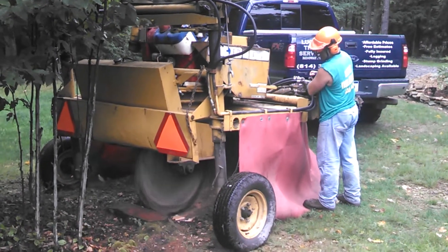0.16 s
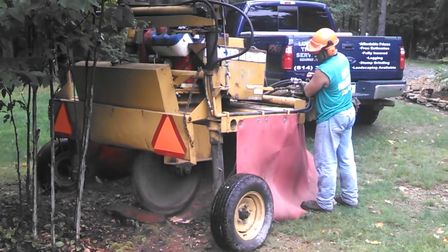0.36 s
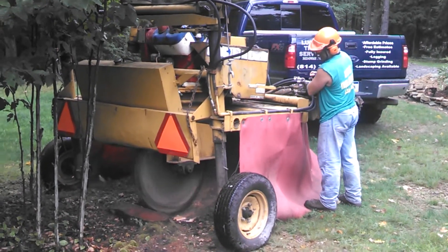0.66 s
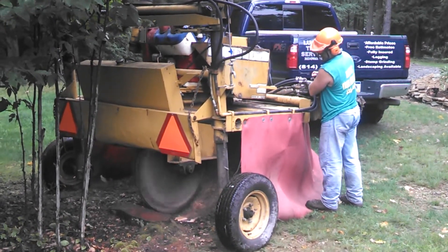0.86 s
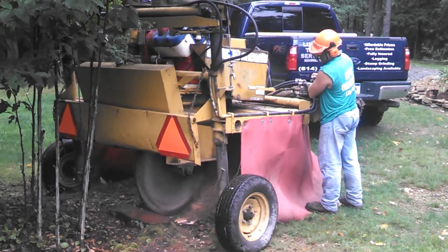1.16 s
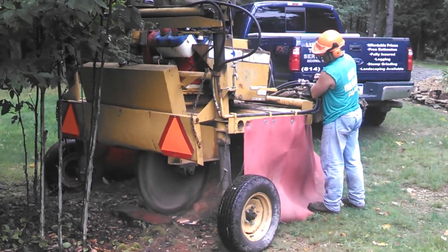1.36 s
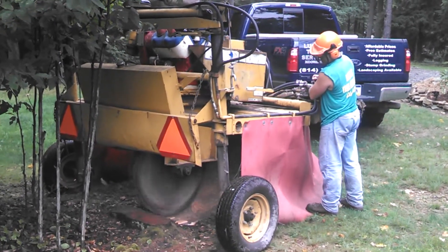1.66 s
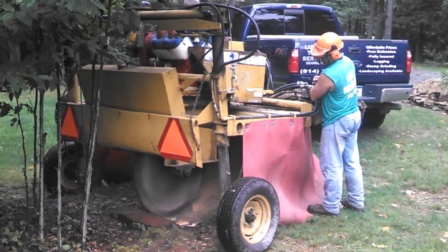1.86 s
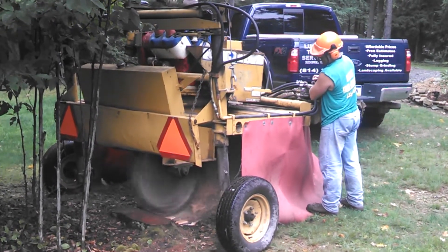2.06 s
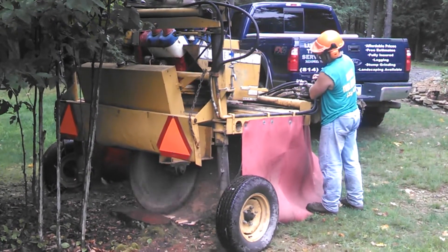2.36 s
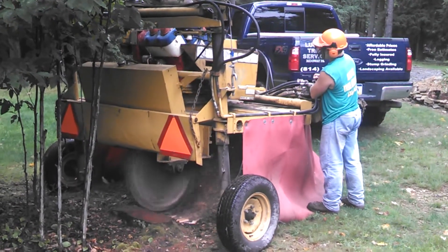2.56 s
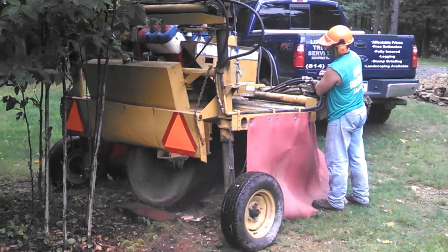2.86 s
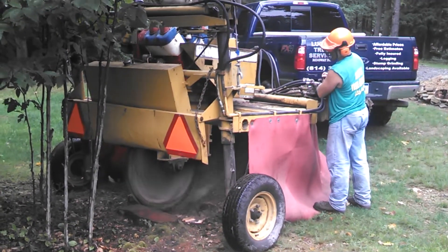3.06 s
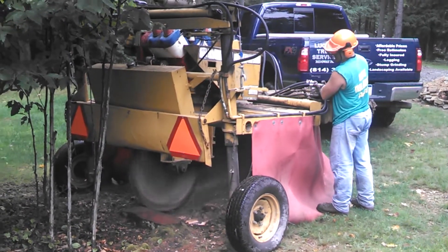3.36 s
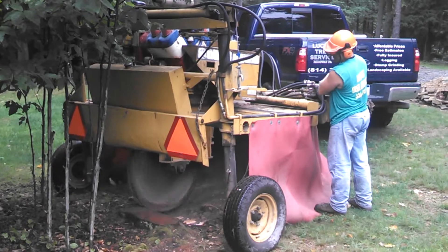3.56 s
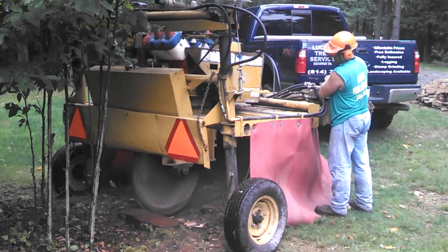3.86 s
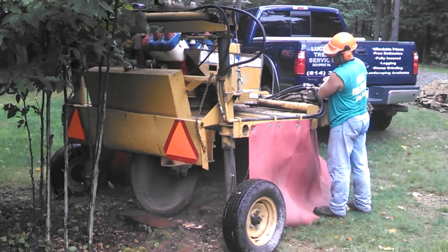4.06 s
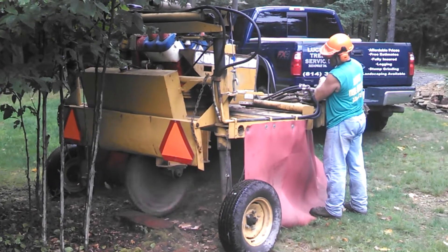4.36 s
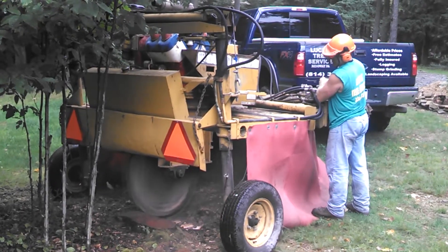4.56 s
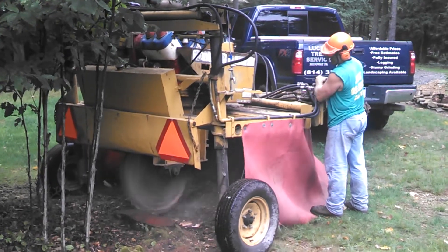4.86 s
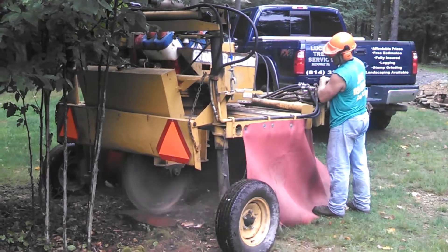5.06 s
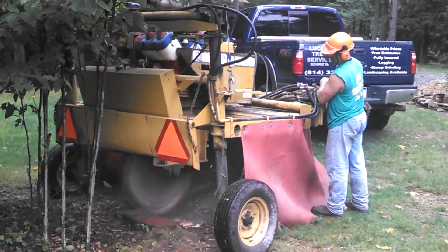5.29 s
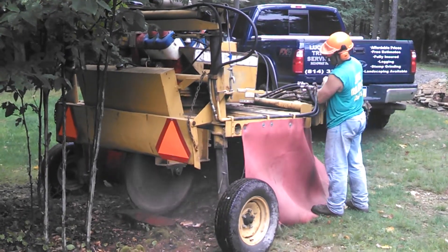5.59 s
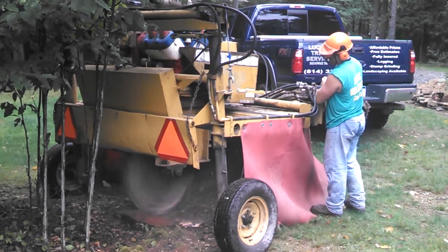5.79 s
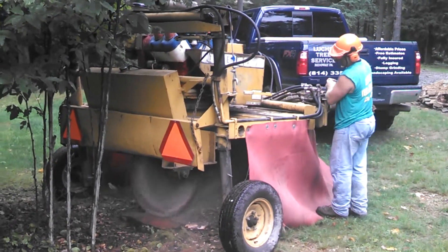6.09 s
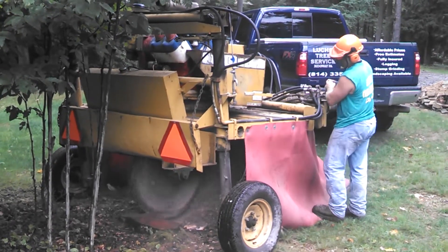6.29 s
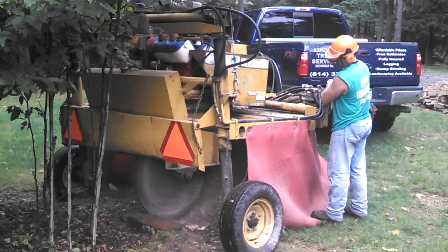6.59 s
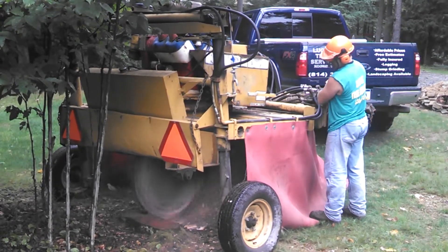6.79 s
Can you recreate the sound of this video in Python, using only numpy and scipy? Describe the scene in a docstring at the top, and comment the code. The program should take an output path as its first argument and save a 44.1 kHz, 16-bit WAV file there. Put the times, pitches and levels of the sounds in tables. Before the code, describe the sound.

Rough, rapid wood grinding outdoors: droning engine, dense rasp and gritty spray, clustered metallic scrapes near three seconds, then ringing chatter as the engine sags.

```python
"""Stump grinder at work outdoors

A stump grinder works a few metres from a camera with two close microphone ports.
The petrol engine, sine lines on its firing rate, hums and sags; tooth blows shape noise into thud, rasp and spray.
Hard bites knock and shriek through resonances, grit splashes, and now and then a tooth pings on a stone.
The camera's gain control ducks at treble peaks and creeps back up; its stereo is widened and band-limited."""
import sys
import numpy as np
from scipy import signal
from scipy.fft import rfft, irfft
from scipy.io import wavfile
from scipy.ndimage import uniform_filter1d, minimum_filter1d

SR = 44100
rng = np.random.default_rng(int(sys.argv[2]) if len(sys.argv) > 2 else 0)


def unload_audio(sound):
    """Save the sound as a 16-bit wav file, at the path given as the first command line argument."""
    columns = np.transpose(np.atleast_2d(sound))
    # keep every value between -1 and 1, then stretch to whole-number steps
    steps = np.round(np.clip(columns, -1, 1) * 32767)
    wavfile.write(sys.argv[1], SR, steps.astype(np.int16))


N = 305602
T = np.arange(N) / SR
HZ = np.fft.rfftfreq(N, 1 / SR)

TOOTH_GROUPS = 4  # groups of teeth round the wheel
GROUPS_PER_FIRING = .4174  # groups that pass for each firing of the engine

# resonances of the wheel and its guard: mode_hz, width_hz, relative_db
WHEEL_MODES = [(702, 50, -10), (744, 28, -9), (774, 32, 1.5), (811, 33, -0.5), (845, 28, -5),
               (877, 35, -1.5), (922, 30, -3.5), (965, 30, -7), (1020, 56, -8)]
# resonances of the sheet-metal hood: mode_hz, width_hz, relative_db
HOOD_MODES = [(530, 70, -4), (700, 60, 0), (1035, 50, 0), (1225, 95, 1), (1320, 50, -3), (1460, 70, -1),
              (1535, 45, -2), (1600, 40, 2.5), (1835, 65, 1), (1965, 80, -1), (2170, 95, 0), (2415, 70, 1),
              (2510, 70, 0), (2900, 260, -6)]
# spectrum of flying dust, chips and grit: frequency_hz, relative_db_per_hz
SPRAY_SPECTRUM = [(500, -25), (2500, -3), (3400, 1), (4200, -1), (5300, 1), (7200, -.3), (9200, 1.5),
                  (10000, -2), (11000, -5.3), (12100, -4), (13000, .3), (15400, .3)]


def amp(db):
    """Decibels to gain."""
    return 10 ** (np.asarray(db) / 20)


def evened(x):
    """Scales each row to rms 1."""
    return x / np.sqrt(np.mean(x ** 2, -1, keepdims=True) + 1e-20)


def curves(rows):
    """Each column of a time table, sample by sample."""
    s, *columns = np.transpose(rows)
    return [np.interp(T, s, c) for c in columns]


def spectra(rows):
    """Each column of a frequency table, bin by bin along a log axis."""
    hz, *columns = np.transpose(rows)
    return [np.interp(np.log(HZ + 1), np.log(hz), c) for c in columns]


def filtered(x, response):
    """Passes x through a frequency response."""
    return irfft(rfft(x) * response, N)


def coloured(x, spectrum):
    """Gives x a spectrum, at rms 1."""
    return evened(filtered(x, amp(spectra(spectrum)[0])))


def rung(x, modes):
    """Lets x drive a set of steep-sided resonances, at rms 1."""
    response = sum(amp(db) / (1 + 2j * (HZ - hz) / width) ** 2 for hz, width, db in modes)
    return evened(filtered(x, response))


def driven_hard(modes):
    """Resonances kept near full swing by a dragging tooth, at rms 1."""
    swing = signal.hilbert(rung(noise(), modes))
    return evened(swing.real / np.hypot(abs(swing), .5))


def wander(rate_hz):
    """Random drift of rms 1, slower than about rate_hz."""
    return evened(filtered(rng.standard_normal(N), np.exp(-(HZ / rate_hz) ** 2)))


def noise():
    """Two rows of noise: the direct sound and the part scattered round the microphone."""
    return rng.standard_normal((2, N))


def clicks(times, sizes):
    """One impulse at each time."""
    return np.bincount(np.round(np.asarray(times) * SR).astype(int), sizes, N)[:N]


def bursts(impulses, rise_s):
    """Each impulse swells to its own height in rise_s and dies away."""
    u = T[:SR // 8] / rise_s
    return signal.oaconvolve(impulses, u * np.exp(1 - u))[:N]


def swells(times, lengths, levels_db):
    """A rounded swell of the given length and height at each time."""
    out = np.zeros(N)
    for s, length, db in zip(times, lengths, levels_db):
        shape = amp(db) * np.sqrt(signal.windows.cosine(round(abs(length) * SR) + 1))
        out[round(s * SR):][:len(shape)] += shape
    return out


def teeth(firings, uneven_db=2.5, lead_db=0.0):
    """The belt-driven wheel brings four groups of teeth round each turn, each blow of uneven depth."""
    passing = T[np.flatnonzero(np.diff(np.floor(firings * GROUPS_PER_FIRING)))]
    depth, late = np.clip(rng.standard_normal((len(passing), 2)), -1.7, 1.7).T
    # lead_db deepens one group's cut; at 0 dB all four are alike
    leading = np.arange(len(passing)) % TOOTH_GROUPS == 0
    # the ragged face of the stump meets each group a little early or late
    times = abs(passing + .0028 * late)
    return clicks(times, amp(uneven_db * depth + lead_db * leading))


def cutting(blows, sag_hz):
    """Thud, ring, rasp and spray follow their level curves, shaken by the uneven grain of the wood."""
    # how deep the wheel cuts as it sweeps across the stump: time_s, depth_db
    cut_depth = [(0, 0.5), (.35, -1.1), (.8, 0.2), (1.25, 1.5), (1.42, -1), (1.58, 1), (2.3, -0.1),
                 (2.85, 1), (3.02, 1.5), (3.25, 1), (3.33, 0.5), (3.62, -3.5), (4.2, -2), (4.55, -1.5),
                 (4.77, 1.8), (5.05, -0.5), (5.35, -0.7), (5.6, 0), (5.8, 0), (6.45, 0.5), (6.93, 0)]
    # level of the low thudding: time_s, level_db
    thud_levels = [(0, -25), (.6, -25.5), (.85, -24.5), (1.9, -24.5), (2.4, -27), (2.84, -24.5), (3, -29.5),
                   (3.4, -30), (4.15, -29), (4.45, -27), (5, -26), (5.2, -25), (6.93, -25)]
    grain_hz, grain_thud_db, grain_ring_db, grain_rasp_db = 3.1, .5, 2.5, 0.1
    # base levels in dB, and the dB gained per dB of cut
    rasp_db, rasp_growth = -25, 0.98
    spray_db, spray_growth = -25.5, 0.89
    ring_base_db, ring_growth = -26.5, 0.84
    ring_db_per_hz = 0.0342  # the wheel rings more as it drags the engine down

    cut_db = curves(cut_depth)[0] + grain_rasp_db * wander(grain_hz)
    thud_db = curves(thud_levels)[0] + grain_thud_db * wander(grain_hz)
    ring_db = ring_base_db + ring_growth * cut_db + ring_db_per_hz * sag_hz
    ring_db = ring_db + grain_ring_db * wander(grain_hz)
    return (thud(blows, thud_db)
            + wheel(blows, ring_db, sag_hz)
            + rasp(blows, rasp_db + rasp_growth * cut_db)
            + spray(blows, spray_db + spray_growth * cut_db))


def thud(blows, level_db, gain_db=0, steady=1.0, rise_s=0.0087):
    """Torn wood and soil drum under the hood: low noise that swells at each blow."""
    # spectrum of the drumming: frequency_hz, relative_db_per_hz
    thud_spectrum = [(20, -49), (45, -34), (75, -20.5), (120, -16), (160, 0.5), (190, -1), (212, -7.5),
                     (245, -2.5), (280, -3), (335, 4.5), (385, -3), (460, -8.5), (620, -10.5), (900, -8.5),
                     (3000, -45)]
    drumming = noise() * (steady + bursts(blows, rise_s))
    return amp(level_db + gain_db) * coloured(drumming, thud_spectrum)


def wheel(blows, level_db, sag_hz, gain_db=-4.0, steady=1.9, rise_s=0.0048, knock=0.41,
          lean_db=-2.5, lean_db_per_hz=1.0, roam_db=3.5, roam_hz=4, waver_s=.0005):
    """Knocks and scrapes ring the wheel; its upper modes lead as load grows and the contact roams."""
    lower_modes = 3  # the first modes, which lead in a light cut
    drive = evened(noise() * (steady + bursts(blows, rise_s)))
    drive[0] += knock * evened(blows)
    lean = amp(lean_db + lean_db_per_hz * sag_hz + roam_db * wander(roam_hz))
    lower = rung(drive, WHEEL_MODES[:lower_modes])
    upper = rung(drive, WHEEL_MODES[lower_modes:])
    ring = (lower + lean * upper) / np.hypot(1, lean)
    wavering = T + waver_s * wander(roam_hz)  # the pitch of the ring drifts a little
    return amp(level_db + gain_db) * np.array([np.interp(wavering, T, row) for row in ring])


def rasp(blows, level_db, fibre_db=0.2, hood_db=-3.5, hood_growth=0.54, steady=2.4, rise_s=0.011,
         clump_db=0.96, splinters_per_s=900, spread_db=2.5):
    """Wood fibres tear in clumps and fling splinters at the hood, which rattles more the harder the cut."""
    # spectrum of tearing fibres: frequency_hz, relative_db_per_hz
    fibre_spectrum = [(100, -41), (450, -11), (650, -2.5), (1000, -3.5), (1350, -2.5), (2000, -3),
                      (2450, -1), (2700, -6), (3000, -7.5), (3450, -11.5), (4300, -27), (12000, -61)]
    tearing = (steady + bursts(blows, rise_s)) * amp(clump_db * wander(126))
    size = amp(spread_db * np.minimum(rng.exponential(1, (2, N)), 4))
    splinters = np.sign(noise()) * size * (rng.random((2, N)) < splinters_per_s / SR)
    rattle_db = hood_db + hood_growth * (level_db - level_db.mean())
    rattle = amp(rattle_db) * rung(splinters * tearing, HOOD_MODES)
    fibres = amp(fibre_db) * coloured(noise() * tearing, fibre_spectrum)
    return amp(level_db) * (fibres + rattle)


def spray(blows, level_db, dust_db=-1, chips_db=-8, chips_per_s=1500, spread_db=-1.0, steady=4.7,
          rise_s=0.0098, gust_db=1.01):
    """A hiss of sawdust and a patter of single chips fly off the wheel, surging with the blows."""
    size = amp(spread_db * np.minimum(rng.exponential(1, (2, N)), 5))
    chips = np.sign(noise()) * size * (rng.random((2, N)) < chips_per_s / SR)
    flow = evened((steady + bursts(blows, rise_s)) * amp(gust_db * wander(23)))
    hiss = amp(dust_db) * coloured(noise(), SPRAY_SPECTRUM)
    patter = amp(chips_db) * coloured(chips, SPRAY_SPECTRUM)
    return amp(level_db) * flow * (hiss + patter)


def bites(wheel_db=0, hood_db=0, splinter_db=-1, rough_db=2.0, rough_hz=220, shriek_db=-2,
          shriek_growth=0.84):
    """A tooth drags hard: the wheel rings, splinters crack on the hood, and the hardest bites shriek."""
    # teeth that catch hard and knock the wheel: start_s, length_s, wheel_ring_db, hood_crack_db
    hard_bites = [(0.436, 0.026, -26, -24), (0.458, .015, -22, -22), (.63, 0.034, -24, -32),
                  (0.681, .014, -28, -22), (0.84, 0.015, -20, -36), (1.323, 0.013, -26, -34),
                  (1.721, .02, -30, -26), (1.819, .013, -24.5, -25), (1.94, .012, -26, -32),
                  (2.051, .012, -49, -24), (2.314, .012, -23, -34), (2.549, 0.023, -28, -25),
                  (2.919, 0.018, -30, -14.5), (2.937, 0.025, -25, -19), (2.999, .013, -29, -18),
                  (3.022, 0.025, -13.5, -16), (3.048, 0.02, -18.5, -23), (3.096, 0.023, -23, -17.5),
                  (3.118, 0.03, -22, -16.5), (3.148, 0.023, -17.5, -18), (3.172, 0.019, -26, -19),
                  (3.205, 0.021, -20.5, -25), (3.225, 0.018, -25, -22.5), (3.253, 0.024, -21.5, -19),
                  (3.43, 0.047, -25.5, -20.5), (4.814, 0.011, -20.5, -28), (4.83, .027, -30, -21),
                  (4.956, 0.019, -31, -22), (5.276, 0.01103, -25, -34), (5.298, .014, -25, -34),
                  (5.376, 0.014, -31, -34), (6.015, 0.014, -26, -36), (6.038, 0.011, -19, -33),
                  (6.064, 0.012, -24, -34), (6.121, .012, -19, -33), (6.15, 0.01, -20, -32),
                  (6.234, .013, -18, -34), (6.343, .011, -20, -34), (6.374, 0.014, -20, -33),
                  (6.455, .011, -20, -34), (6.489, .012, -17.5, -34), (6.513, .012, -16.5, -34),
                  (6.579, 0.016, -23, -31)]
    # higher wheel modes that only a hard bite excites: mode_hz, width_hz, relative_db
    shriek_modes = [(1216, 42, -12), (1485, 39, 0.5), (1530, 31, -2), (1604, 47, 4), (1843, 40, -8),
                    (2014, 77, -6)]
    # spectrum of splitting wood: frequency_hz, relative_db_per_hz
    splinter_spectrum = [(500, -28), (1900, 13.5), (2500, 20), (4000, 2), (7000, -9), (10000, -29),
                         (14000, -28)]
    deep_modes = 2  # the first hood modes, too deep for a sharp crack to stir

    s, length, ring_db, crack_db = np.transpose(hard_bites)
    hood_crack = rung(noise(), HOOD_MODES[deep_modes:])
    splitting = amp(splinter_db) * coloured(noise(), splinter_spectrum)
    crack = evened((hood_crack + splitting) * amp(rough_db * wander(rough_hz)))
    high_db = crack_db + shriek_db + shriek_growth * (crack_db - crack_db.max())
    return (driven_hard(WHEEL_MODES) * swells(s, length, ring_db + wheel_db)
            + crack * swells(s, length, crack_db + hood_db)
            + driven_hard(shriek_modes) * swells(s, length, high_db))


def chatter(blows, sag_hz, steady=1.4, rise_s=0.014, focus_hz=715, focus_per_sag=10.0, span_hz=100,
            drift=0.24, drift_hz=6):
    """The wheel judders in the cut and its modes sing on; more engine sag makes higher modes lead."""
    # spells in which the wheel rings at every blow: start_s, length_s, level_db
    spells = [(1.1, 1, -33.5), (2.963, 0.45, -34), (5.14, 0.36, -27), (5.898, 0.29, -25), (6.21, 0.47, -25)]
    focus = focus_hz + focus_per_sag * sag_hz
    ring = np.zeros(N)
    for hz, _, db in WHEEL_MODES:
        nearness = np.exp(-((hz - focus) / span_hz) ** 2)
        cycles = hz * T + drift * wander(drift_hz) + rng.random()
        ring += amp(db) * nearness * np.sin(2 * np.pi * cycles)
    singing = evened(ring * (steady + bursts(np.sqrt(blows), rise_s)))
    return np.array([swells(*np.transpose(spells)) * singing, np.zeros(N)])


def stones():
    """A hard tooth tip pings on a stone: a few high modes die away within milliseconds."""
    # teeth that strike a stone: time_s, level_db
    strikes = [(0.6945, -11), (3.2654, -10.5), (3.269, -15), (5.458, -13)]
    # what a tooth rings with on stone: mode_hz, relative_db, t60_s
    tooth_modes = [(8950, -4, .014), (9600, 0, .016), (10350, -3, .014), (12300, -9, .01),
                   (14600, -10, .01)]
    s, db = np.transpose(strikes)
    t = T[:SR // 20]
    ping = sum(amp(level - 60 * t / t60) * np.sin(2 * np.pi * hz * t) for hz, level, t60 in tooth_modes)
    return np.array([signal.oaconvolve(clicks(s, amp(db)), ping)[:N], np.zeros(N)])


def grit(firings, gain_db=-3, rise_s=0.0038):
    """Grit flung at the hood: short bright splashes, once a turn of the wheel."""
    # spells of flung grit: start_s, length_s, level_db (ahead of gain_db)
    spells = [(2.526, .05, -19), (4.724, .05, -16.5), (5.42, .05, -24), (5.455, .05, -23),
              (5.561, 1.15, -18)]
    turns = firings * GROUPS_PER_FIRING / TOOTH_GROUPS
    throws = np.zeros(N)
    for s, length, db in spells:
        first, last = np.interp([s, s + length], T, turns)
        times = np.interp(np.arange(first, last), turns, T)
        throws += clicks(times, np.full(len(times), amp(db + gain_db)))
    return coloured(noise(), SPRAY_SPECTRUM) * bursts(throws, rise_s)


def engine(firings, sag_hz, flutter_db=1.04, jitter=0.017):
    """Exhaust lines locked to the firing rate; load shifts their balance, uneven combustion shakes them."""
    # level of the deep fundamental: time_s, level_db
    fundamental = [(0, -45), (1.4, -47.5), (1.85, -44.5), (2.75, -38), (3.1, -45.5), (3.55, -44.5),
                   (3.95, -58), (4.7, -45.5), (5.55, -47), (6.1, -43.5), (6.6, -41), (6.93, -39)]
    # levels of the drone: time_s, twice_firing_rate_db, three_times_firing_rate_db
    drone = [(0, -29, -34), (.4, -31, -33.5), (.8, -30, -31.5), (1.2, -27.5, -30), (1.6, -42, -34),
             (2.4, -36.5, -35), (2.9, -55, -32), (3.2, -36.5, -42), (3.6, -36, -36), (3.95, -32.5, -29),
             (4.35, -29, -27.5), (4.72, -27.5, -26.5), (5, -36, -29.5), (5.22, -34, -26.5),
             (5.6, -35, -34.5), (5.9, -32, -46), (6.25, -40.5, -36), (6.93, -40, -48)]
    # faint overtones: multiple_of_firing_rate, free_speed_db, gain_db_per_hz_of_sag
    overtones = [(2.5, -48.5, 0), (4, -43.5, 0.06), (5, -51, 0.82), (6, -48, 0), (8, -37.5, -0.24)]
    second_db, third_db = curves(drone)
    lines = [(1, curves(fundamental)[0]), (2, second_db), (3, third_db)]
    lines += [(k, db + slope * sag_hz) for k, db, slope in overtones]
    cycles = firings + jitter * wander(44)
    hum = np.zeros(N)
    for k, db in lines:
        level = amp(db + flutter_db * wander(14)) * np.sqrt(2)
        hum += level * np.sin(2 * np.pi * (k * cycles + rng.random()))
    return np.array([hum, np.zeros(N)])


def ports(direct, scattered):
    """Two close microphone ports: their difference follows the direct sound only in part."""
    # difference of the ports against their sum: frequency_hz, level_db, likeness_0_to_1, phase_rad
    port_difference = [(40, -19, .9, .45), (90, -16.5, 0.9, .45), (191, -16, 0.92, 0.35),
                       (335, -20, 0.8, 0.032), (430, -5.5, 0.06, 1.3), (560, -4, 0.75, 0.15),
                       (760, -11, .82, 0.23), (1100, -6, .55, 0.21), (1490, 2, 0.64, 0.6),
                       (2220, -3.5, 0.79, 1.03), (3800, 5, 0.2, 0.98), (5900, -0.5, 0.9, -0.35),
                       (9300, -0.5, 0.8, -0.091), (11900, 0, 0.3, 0.97)]
    db, like, phase = spectra(port_difference)
    like = np.clip(like, 0, 1)
    alike = filtered(direct, amp(db) * like * np.exp(1j * phase))
    unlike = filtered(scattered, amp(db) * np.sqrt(1 - like ** 2))
    side = alike + unlike
    return np.array([direct + side, direct - side])


def scene():
    """The engine turns the wheel; the blows of its teeth drive the cutting sounds."""
    # engine speed, sagging under load: time_s, firing_rate_hz
    speed = [(0, 95.24), (.6, 94.9), (.9, 94.25), (1.5, 92.33), (1.8, 90.7), (2.35, 89.5), (2.65, 90.66),
             (3, 93.17), (3.7, 96.48), (4.22, 97.7), (4.55, 97.5), (4.82, 95.65), (5.12, 93.15),
             (5.5, 91.2), (6.33, 84.9), (6.93, 85.9)]
    free_hz = 98  # firing rate without load
    rate_hz, = curves(speed)
    firings, sag_hz = np.cumsum(rate_hz) / SR, free_hz - rate_hz
    blows = teeth(firings)
    grinding = cutting(blows, sag_hz) + bites() + chatter(blows, sag_hz) + stones() + grit(firings)
    return ports(*(grinding + engine(firings, sag_hz)))


def gain_control(x, threshold_db=-19.5, recovery_db_per_s=6.0):
    """Treble peaks pull the gain down just before they pass; it then creeps back."""
    treble = filtered(x.mean(0), HZ ** 2 / (HZ ** 2 + 5000 ** 2))
    power_db = 10 * np.log10(abs(uniform_filter1d(treble ** 2, size=44)) + 1e-12)
    recovery = recovery_db_per_s * T
    held_db = np.maximum.accumulate(power_db + recovery) - recovery  # peaks, falling steadily
    over_db = np.maximum(held_db - threshold_db, 0)
    early_db = minimum_filter1d(-over_db, size=110)  # the window reaches ahead of each peak
    return x * amp(uniform_filter1d(early_db, size=110))


def widened(x):
    """Stereo widening: each side gets the other, late and inverted, which combs sum and difference."""
    # bands in which the middle of the stereo picture sounds hollow: centre_hz, width_hz
    hollow_bands = [(2825, 210), (5470, 440), (11130, 620)]
    hollow_db, cross_samples = -39, 16
    angle = np.pi * HZ * cross_samples / SR
    # a bass lift makes up for what the centre loses below the comb's first crest
    lift = 1 / np.maximum(np.sin(np.minimum(angle, np.pi / 2)), .02)
    hollow = sum(np.exp(-(2 * (HZ - hz) / width) ** 4) for hz, width in hollow_bands)
    mid = filtered((x[0] + x[1]) / 2, lift * np.sin(angle) * amp(hollow_db * hollow))
    side = filtered((x[0] - x[1]) / 2, lift * np.cos(angle) / 1j)
    return np.array([mid + side, mid - side])


def record(dry):
    """Gain control, stereo widening, then the band limit."""
    edge_hz = 15520
    lowpass = signal.firwin(511, edge_hz, window=("kaiser", 9), fs=SR)
    return signal.oaconvolve(widened(gain_control(dry)), lowpass[None], "same")


dry = scene()
out = record(dry)
unload_audio(out)
```